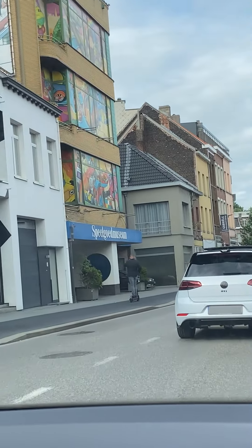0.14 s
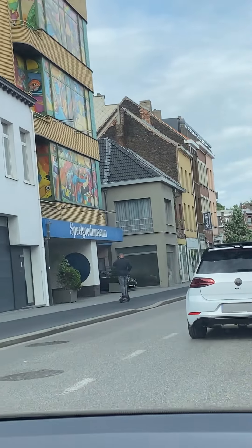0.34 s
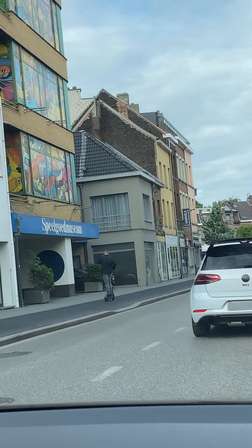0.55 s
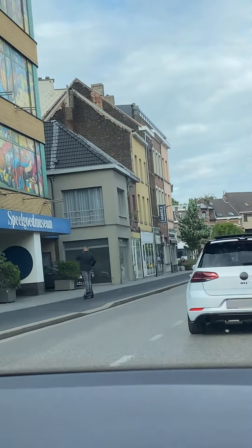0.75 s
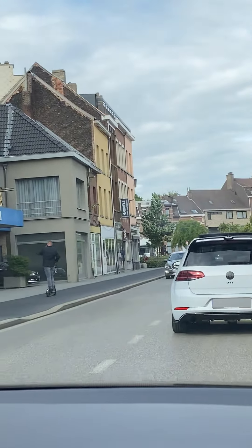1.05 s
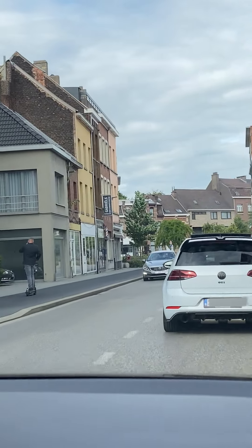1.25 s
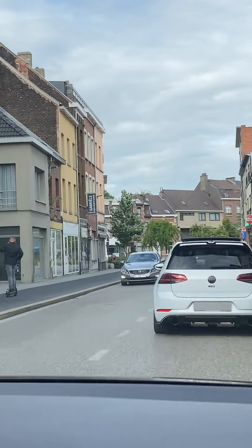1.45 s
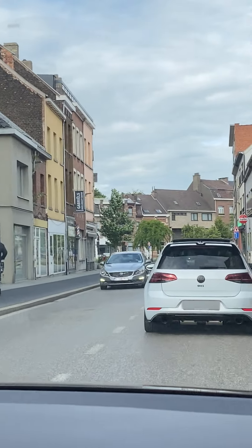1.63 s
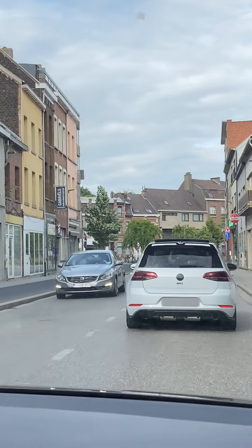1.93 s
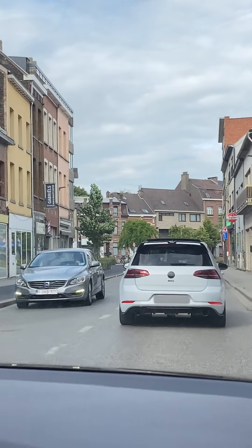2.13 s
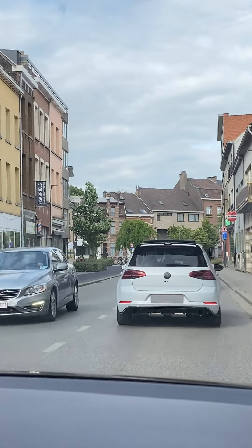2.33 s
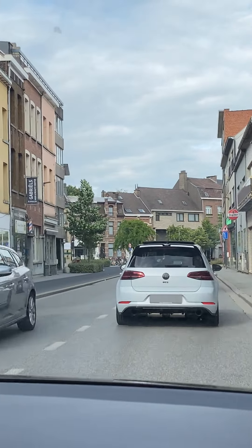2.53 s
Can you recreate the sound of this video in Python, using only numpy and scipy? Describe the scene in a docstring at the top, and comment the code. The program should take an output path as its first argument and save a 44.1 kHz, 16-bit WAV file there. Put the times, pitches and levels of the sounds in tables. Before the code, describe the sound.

A tuned car's exhaust pops and bangs in a rapid, booming burst from about 0.2 to 0.7 seconds, with a few weaker pops near 1 second. At 1.3 seconds its engine revs with a raspy growl and metallic buzz, easing to a drone by 2 seconds. It is heard from inside the following car, over low rumble and tyre noise, with that car's engine hum rising from about 1.7 seconds.

```python
"""A tuned car heard from the car behind.

On a town street, fuel igniting in a hot exhaust pops and booms on the overrun. The throttle is then
blipped and the car pulls away: its periodic firing gives a growl shaped by pipe resonances, a rasp
and a metallic buzz. The following car hums as it gathers speed, over tyre noise, low rumble and
a few ticks of loose trim. Two spaced microphones in its cabin pick up the sound."""
import sys
import numpy as np
from scipy import signal
from scipy.fft import rfft, irfft
from scipy.io import wavfile
from scipy.ndimage import uniform_filter1d, minimum_filter1d

SR = 44100
rng = np.random.default_rng(int(sys.argv[2]) if len(sys.argv) > 2 else 0)


def transcribe(signal):
    """Save signal, clipped to [-1, 1], as a 16-bit WAV file at the path in sys.argv[1]."""
    frames = np.atleast_2d(signal).T
    limited = np.clip(frames, -1, 1)
    pcm = np.round(limited * 32767).astype(np.int16)
    wavfile.write(sys.argv[1], SR, pcm)


N = 118188
T = np.arange(N) / SR
HZ = np.fft.rfftfreq(N, 1 / SR)

# The microphone pair. Each row: frequency in Hz, coherence from 0 to 1, left over right in dB.
MIC_PAIR = [(50,0.72,5.5),(113,0.82,2),(205,0.12,-3),(382,0.17,1),(650,0.25,-3),(1080,0.49,0),(1420,1,0),(2130,0.29,0),(3980,0.11,0.5),(7500,0.16,-4),(9120,0.26,-1),(12600,0.29,1)]


def amp(db):
    """Amplitude ratio of a level in decibels."""
    return 10 ** (np.asarray(db) / 20)


def curve(rows, column=1):
    """Linear interpolation of a time table at every sample."""
    rows = np.array(rows)
    return np.interp(T, rows[:, 0], rows[:, column])


def spectrum(rows, column=1, hz=HZ):
    """Interpolation of a frequency table on a logarithmic axis."""
    rows = np.array(rows)
    return np.interp(np.log(hz + 1), np.log(rows[:, 0] + 1), rows[:, column])


def unit(x):
    """Normalisation to rms 1."""
    return x / np.sqrt(np.mean(abs(x) ** 2) + 1e-20)


def drift(hz):
    """Low-pass noise: a slow random wander of rms 1."""
    t = np.linspace(0, T[-1], 1024)
    low_pass = np.exp(-(np.fft.rfftfreq(len(t), t[1]) / hz) ** 2)
    return unit(np.interp(T, t, irfft(rfft(rng.standard_normal(len(t))) * low_pass)))


def tint(x, colour):
    """Minimum-phase filtering: folding the cepstrum makes the response causal."""
    cepstrum = irfft(np.log(amp(spectrum(colour))), N)
    fold = 1 + np.sign(N / 2 - np.arange(N)) * (np.arange(N) > 0)
    return irfft(rfft(x) * np.exp(rfft(cepstrum * fold)), N)


def noise(colour):
    """Two uncorrelated noises with the same spectrum."""
    return unit(tint(rng.standard_normal((2, N)), colour))


def arrive(x):
    """Time and level differences between the microphones: the left lags, except in the bass."""
    lag_s, bass_hz = 0.0004493, 270
    side = amp(spectrum(MIC_PAIR, column=2) / 2)
    lag = np.exp(-2j * np.pi * HZ * lag_s * HZ ** 2 / (HZ ** 2 + bass_hz ** 2))
    return irfft(rfft(x) * np.array([lag * side, 1 / side]), N)


def diffuse(x, other):
    """Partial coherence in a diffuse field: the left microphone hears partly other reflections."""
    coherence = spectrum(MIC_PAIR)
    left = irfft(coherence * rfft(x) + np.sqrt(1 - coherence ** 2) * rfft(other), N)
    return arrive(np.array([left, x]))


def reverb(x, t60):
    """Reverberation: dense reflections, different at each microphone, fall 60 dB in t60 seconds."""
    t, build_s = T[:SR], .001
    tail = rng.standard_normal((2, SR)) * amp(-60 * t / t60) * (1 - np.exp(-t / build_s))
    return signal.fftconvolve(x[None], unit(tail) / np.sqrt(SR), axes=1)[:, :N]


def orders(cycles, rows, fading):
    """Multipath fading: multiples of the firing rate waver as the street's reflections shift."""
    out = np.zeros((2, N))
    for multiple, db in rows:
        tone = amp(db) * np.sqrt(2) * np.exp(2j * np.pi * (multiple * cycles + rng.random()))
        for channel in out:
            scattered = drift(hz=7) + 1j * drift(hz=7)
            channel += (tone * unit(1 + fading * scattered)).real
    return out


def cabin():
    """The following car: harmonic engine hum over broadband tyre noise and an uneven low rumble."""
    # Its engine. Each row: time in seconds, firing rate in Hz, gain in dB.
    engine = [(0,44,-49),(1.2,45,-61),(1.5,51.15,-53),(1.74,51.97,-29),(2,56.59,-40),(2.26,60.33,-26.5),(2.5,61.64,-27),(2.68,60.97,-30)]
    # Each row: multiple of the firing rate, relative level in dB.
    harmonics = [(1,5.5),(2,2.5),(3,-17.5),(4,-15)]
    # Noise spectra. Each row: frequency in Hz, relative level in dB.
    tyre_colour = [(20,-43),(45,-7),(80,-6.5),(130,-3),(180,-12.5),(270,-15),(380,-17.5),(520,-20),(700,-25.5),(950,-25.5),(1300,-24.5),(1700,-35.5),(2400,-37),(3200,-45),(4500,-53),(6500,-52.5),(9500,-63.5),(12000,-67.5),(14400,-72)]
    rumble_colour = [(15,0),(35,11),(55,-1.5),(90,-9),(130,-2),(250,-13.5),(500,-39),(2000,-90)]
    # Noise envelopes. Each row: time in seconds, level in dB.
    tyre_level = [(0,-25),(.4,-23.5),(.7,-21.5),(1.05,-24.5),(1.8,-20),(2.3,-23.5),(2.68,-20.5)]
    rumble_level = [(0,-12.5),(.13,-18.5),(.3,-9),(.6,-9),(.75,-19.5),(.93,-18.5),(1.05,-30),(1.6,-20),(2.68,-26)]
    cycles = np.cumsum(curve(engine)) / SR
    pan = amp([[.9], [-.9]])
    hum = amp(curve(engine, column=2)) * orders(cycles, harmonics, fading=.12) * pan
    tyres = amp(curve(tyre_level) + 1.59 * drift(hz=9.6)) * noise(tyre_colour)
    rumble = noise(rumble_colour)
    rumble = unit(rumble + .13 * rumble[::-1])  # the two sides are slightly correlated
    return arrive(hum) + diffuse(*tyres) + amp(curve(rumble_level)) * rumble


def trim_ticks():
    """Light impacts of loose trim: noise bursts with exponential decay."""
    # Each row: start in seconds, level in dB.
    ticks = [(.033,-48),(0.499,-42.5),(0.5447,-41.5),(0.793,-43.5),(2.231,-41)]
    # Their spectrum. Each row: frequency in Hz, relative level in dB.
    colour = [(500, -9), (3000, -3), (7000, -2), (10000, -11.5), (14000, -6.5)]
    decay_s = .0047
    envelope = sum(amp(db) * (T >= start) * np.exp(-abs(T - start) / decay_s) for start, db in ticks)
    return diffuse(*(envelope * noise(colour)))


def booms():
    """Late-burning fuel swings the air through a few slow cycles: low-frequency tone bursts."""
    # Each row: start and length in seconds, pitch in Hz, level in dB, left phase lead in radians.
    bursts = [(0.18,0.037,44.6,-6,1),(.246,.045,132,-9,1.7),(0.304,0.064,115.3,-10.5,0.5),(0.347,.11,65.4,-3.5,2),(0.467,0.083,91.3,-8.5,1.7),(.525,0.034,188,-9,0.95),
              (0.577,0.11,64,-10.5,.5),(0.651,0.09,235,-17.5,1),(0.853,0.053,52,-11,0.5),(.9,0.08,50.7,-9,1),(.924,0.015,230,-15.5,1.4)]
    out = np.zeros((2, N))
    for start, length, hz, db, lead in bursts:
        swell = np.sin(np.pi * np.clip((T - start) / length, 0, 1) ** .69)  # peaks early
        phase = 2 * np.pi * hz * (T - start) + np.array([[.5], [-.5]]) * lead
        out += amp(db) * swell * np.sin(phase)
    return out


def growl(cycles, firing_hz, eased_db):
    """Source and filter: pipe resonances shape the upper orders, which dull as the throttle eases."""
    # Pipe response at full throttle. Each row: frequency in Hz, gain in dB.
    pipe = [(140,-5),(245,7),(310,0.5),(400,7.5),(500,-1),(585,-3),(650,-2.5),(715,4),(805,2),(890,-2.5),(1000,-28)]
    # The strongest band shifts as the car moves. Each row: time in seconds, centre in Hz.
    band = [(.76,560),(.86,720),(.98,430),(1.22,550),(1.36,440),(1.43,780),(1.48,790),(1.53,715),(1.61,720),(1.7,640),(2.1,650)]
    band_db, half_width_hz = 9, 55
    half_order_db = -13  # from unequal cylinders
    multiples = np.array([1.5, *np.arange(2.5, 10, .5)])
    hz = multiples[:, None] * firing_hz
    db = spectrum(pipe, hz=hz) + half_order_db * (multiples[:, None] % 1 > 0)
    db += band_db / (1 + ((hz - curve(band)) / half_width_hz) ** 2)
    db_per_octave = 12.5 * eased_db / 60
    db -= db_per_octave * np.maximum(np.log2(hz / 656), 0)  # roll-off above 656 Hz
    return orders(cycles, zip(multiples, db), fading=.45) / np.linalg.norm(amp(db), axis=0)


def buzz(cycles):
    """Forced vibration: every other firing knocks the metal, whose modes swell as orders cross them."""
    # Each row: frequency in Hz, relative energy in dB, time to fall 60 dB in seconds.
    modes = [(1654,2,.11),(2026,0,0.082),(2430,-11.5,0.058),(2670,-7.5,0.073),(4290,-10,.06)]
    knocks = np.diff(np.floor(cycles / 2), prepend=0)
    t = T[:SR // 5]
    metal = sum(amp(db - 60 * t / t60) / np.sqrt(t60) * np.sin(2 * np.pi * hz * t)
                for hz, db, t60 in modes)
    return unit(signal.oaconvolve(knocks, metal)[:N])


def rasp(cycles):
    """Amplitude-modulated noise: each firing gives a puff of hiss and a short ring of the pipe."""
    # Spectrum of both. Each row: frequency in Hz, relative level in dB.
    colour = [(60,-30.5),(200,-8),(450,4),(800,3),(1000,-6.5),(1250,-0.5),(1450,-5),(1850,-12),(2040,0),(2250,-8),(2650,-9.5),(3100,-16),(4200,-18),(5000,-19),(6200,-18.5),(8000,-28.5),(10000,-35),(12000,-34.5),(13500,-51.5),(14500,-34)]
    depth, puff_cycles, ring_db = .1, .85, -8.5
    puffs = unit(1 - depth + depth * unit(np.exp(-(cycles % 1) / puff_cycles)))
    firings = np.diff(np.floor(cycles), prepend=0)
    ring = unit(reverb(tint(firings, colour), t60=.028))
    return puffs * noise(colour) + amp(ring_db) * ring


def exhaust():
    """Periodic excitation: the tuned engine's firing drives its note, growl, buzz and rasp."""
    # Each row: time in seconds, firing rate in Hz.
    firing = [(0,84),(.6,80.5),(.78,79.5),(1,85),(1.22,92.3),(1.31,97),(1.42,99.3),(1.47,99.5),(1.52,100.6),(1.6,101.7),(1.66,103),(1.7,105.5),(1.79,106),(1.86,104.8),(2,108),(2.21,110),(2.45,108),(2.68,112)]
    # Each row: time in seconds, then levels in dB of the fundamental, its octave and the growl.
    note = [(0,-26,-39,-50),(.6,-26.5,-35.5,-27),(.8,-25.5,-38,-31.5),(1.05,-37,-30,-31),(1.24,-33.5,-26.5,-33.5),(1.34,-10.5,-15,-16),(1.41,-12.5,-20,-16),(1.47,-10,-25.5,-23.5),(1.52,-22,-16,-14),(1.61,-20.5,-23,-19.5),(1.68,-17,-32.5,-27),(1.8,-22.5,-27,-25.5),(2.05,-24,-27,-33),(2.2,-28.5,-37,-46.5),(2.68,-28,-30.5,-40.5)]
    # The throttle. Each row: time in seconds, level of the rasp in dB.
    throttle = [(0,-59),(1.1,-38.5),(1.26,-37.5),(1.34,-27),(1.41,-22.5),(1.49,-22.5),(1.59,-29),(1.7,-28.5),(1.8,-34.5),(1.95,-41.5),(2.2,-38),(2.68,-37.5)]
    firing_hz, rasp_db = curve(firing), curve(throttle)
    eased_db = rasp_db.max() - rasp_db
    buzz_db = rasp_db.max() - 10 - 1.5 * eased_db  # dies faster than the rasp as the throttle closes
    cycles = np.cumsum(firing_hz * (1 + .004 * drift(hz=40))) / SR
    tone = amp(curve(note)) * orders(cycles, [(1, 0)], fading=.042)
    tone += amp(curve(note, column=2)) * orders(cycles, [(2, .011)], fading=.15)
    tone += amp(curve(note, column=3)) * growl(cycles, firing_hz, eased_db)
    tone += amp(buzz_db) * buzz(cycles)
    return arrive(tone) + diffuse(*(amp(rasp_db) * rasp(cycles)))


def blast(corner_hz):
    """A critically damped pressure pulse: the higher its corner frequency, the sharper the pop."""
    u = 2 * np.pi * corner_hz * T[:SR // 50]
    return u * np.exp(-u) * 2 * np.pi * corner_hz / SR


def pops():
    """Impulsive excitation: fuel bangs and sputters in the hot pipe; cabin and street reverberate."""
    # Each row: start in seconds, relative level in dB, corner frequency in Hz.
    bangs = [(.1828,8,850),(.1897,2,1140),(.2452,-8,2980),(.2478,0,2400),(.2518,5.5,900),(.254,-3.5,1750),
             (.264,-4,596),(.2677,-3,2500),(.278,-1.5,1100),(.2985,4,1300),(.305,1,1020),(.3133,6.5,435),(.3255,-3,700),(.333,1.5,710),(.339,5.5,600),
             (.354,0,300),(.3662,-4.5,900),(.3761,12.5,1110),(.3795,8,3000),(.383,3,600),(.3908,8,950),(.399,5,355),(.4166,6,1500),(.4208,8,1400),
             (.438,6.5,376),(.452,0,347),(.4624,-10.5,1540),(.472,-3,1090),(.4798,-0.5,1390),(.489,5.5,400),(.5,-4,1220),(.5101,-5,900),(.527,-4,700),(.5339,-5,1000),(.539,0,700),
             (.5444,-0.5,794),(.555,-2,1280),(.5622,0,600),(.588,-5.5,1090),(.602,-4,1190),(.6358,-3,900),(.926,-5.5,700),(.932,-1,370),(1.024,-11.5,900)]
    # The filter common to all pops. Each row: frequency in Hz, gain in dB.
    colour = [(30,-37),(70,-6.5),(120,5.5),(200,-5),(330,9),(520,0.5),(750,-0.5),(1250,2),(1800,-10.5),(2300,-16.5),(3100,-29),(5000,-33),(14000,-55.5)]
    sputter_per_s, sputter_db, left_lag_s = 400, -16, .00044
    cabin_db, silencer_db, street_db = -6, -1, -22.5
    groups = np.zeros((5, N))  # each has its own cabin reflections, as the cars move
    for i, (start, db, hz) in enumerate(bangs):
        pulse = amp(db) * blast(hz)
        groups[i % len(groups), round(start * SR):][:len(pulse)] += pulse
    sputter = (rng.random(N) < sputter_per_s / SR) * rng.exponential(1, N)
    sputter *= (T > .295) & (T < .57)
    groups[0] += amp(sputter_db) * signal.oaconvolve(sputter, blast(corner_hz=650))[:N]
    groups = amp(22.5) * tint(groups, colour)
    source = groups.sum(0)
    direct = np.array([np.interp(T - left_lag_s, T, source), source])
    inside = amp(cabin_db) * sum(reverb(group, t60=.016) for group in groups)
    lows = irfft(rfft(source) / (1 + (HZ / 600) ** 4), N)
    silencer = amp(silencer_db) * reverb(lows, t60=.045)  # rings on after each bang
    street = amp(street_db) * reverb(source, t60=.12)
    return (direct + inside + silencer + street) * amp([[-3], [3]])  # louder on the right


def scene():
    """Superposition of both cars at the two microphones."""
    return pops() + booms() + exhaust() + cabin() + trim_ticks()


def record(dry):
    """High-pass filtering, fast peak limiting, then low-pass filtering."""
    low_cut_hz, high_cut_hz = 41.6, 14400
    ceiling, window = .93, round(.004 * SR)
    x = irfft(rfft(dry) * (1 - 1 / (1 + (HZ / low_cut_hz) ** 4)), N)
    gain = ceiling / np.maximum(abs(x).max(0), ceiling)
    gain = uniform_filter1d(minimum_filter1d(gain, window), window)
    low_pass = signal.firwin(511, high_cut_hz, window=("kaiser", 9), fs=SR)
    return signal.oaconvolve(x * gain, low_pass[None], "same")


dry = scene()
out = record(dry)
transcribe(out)
```